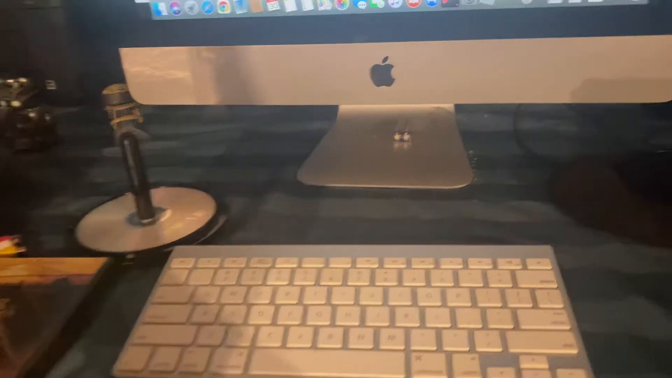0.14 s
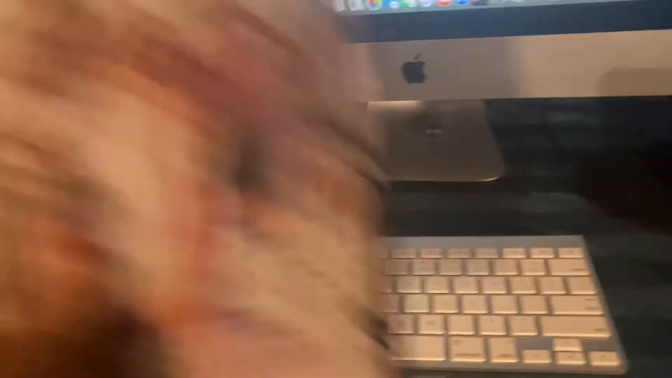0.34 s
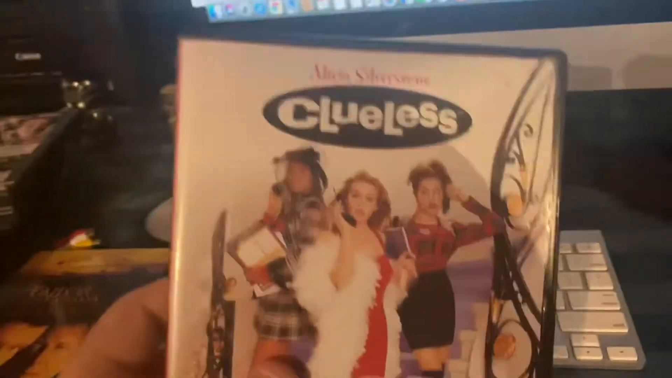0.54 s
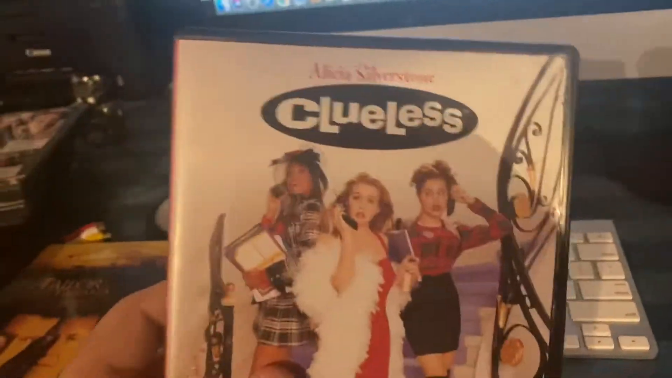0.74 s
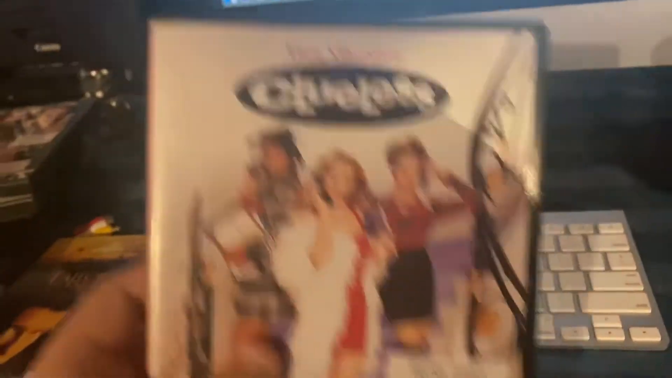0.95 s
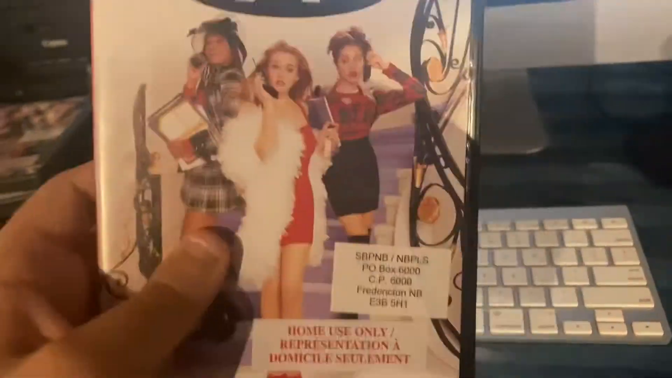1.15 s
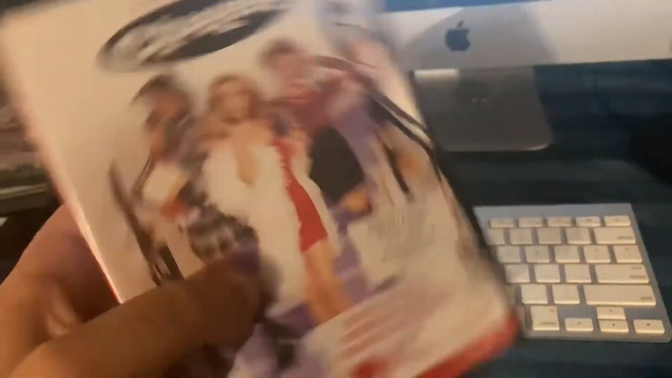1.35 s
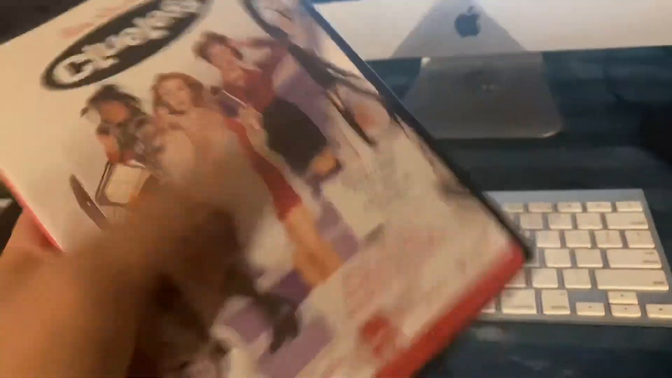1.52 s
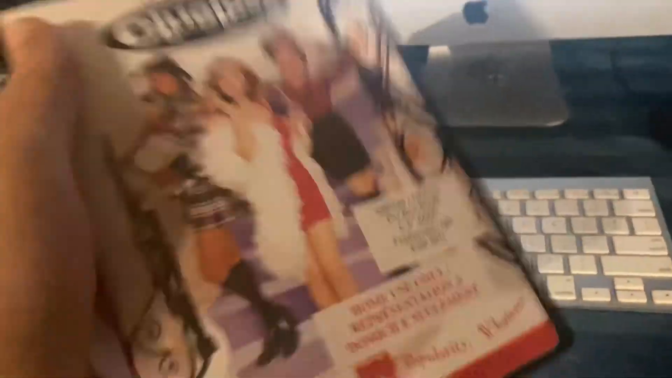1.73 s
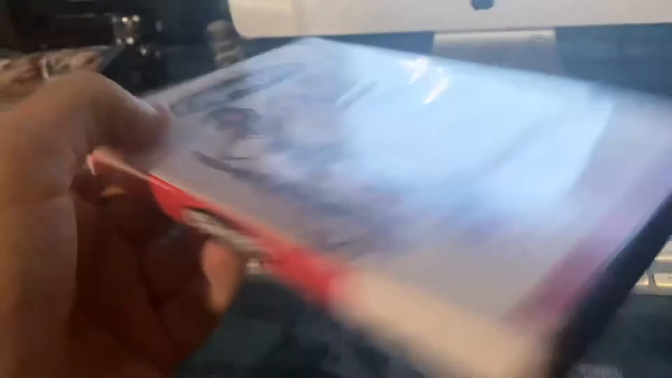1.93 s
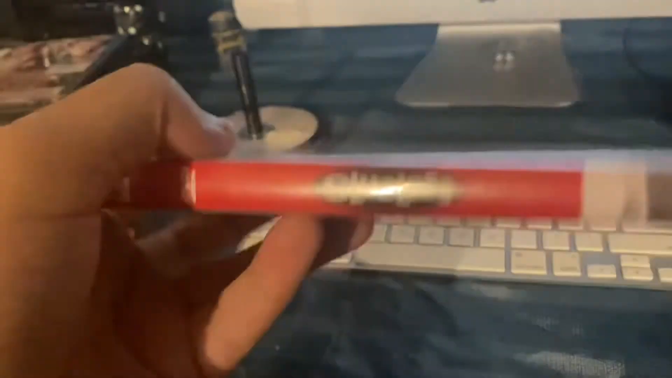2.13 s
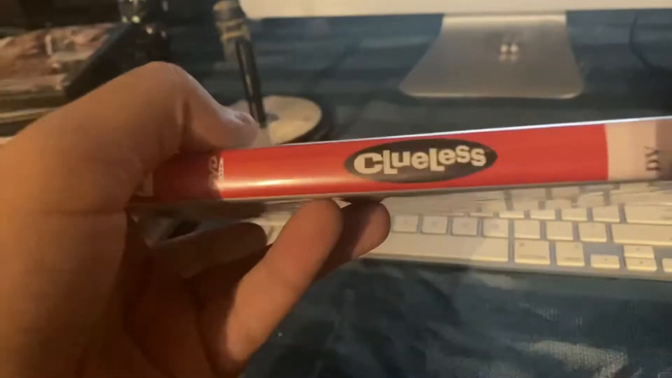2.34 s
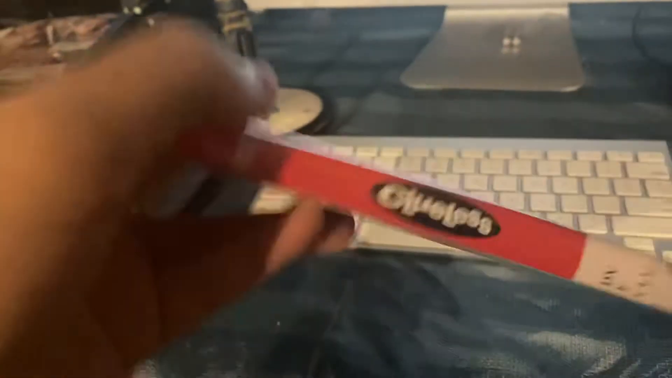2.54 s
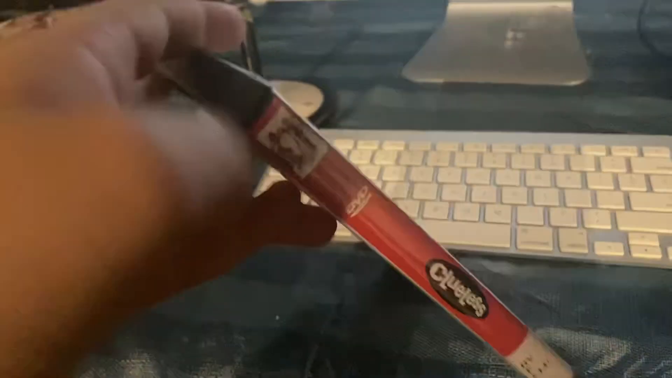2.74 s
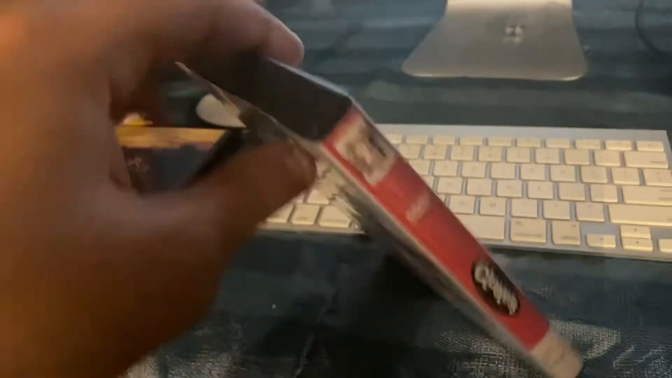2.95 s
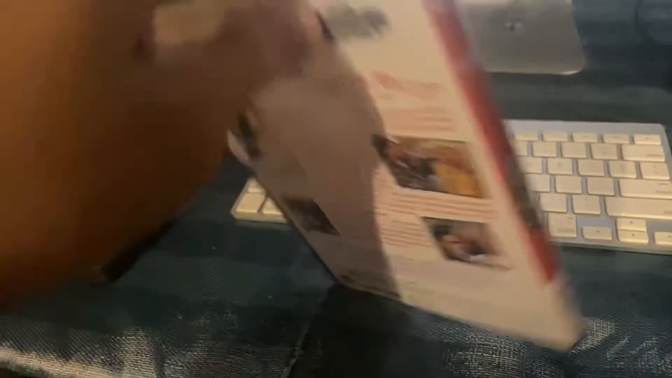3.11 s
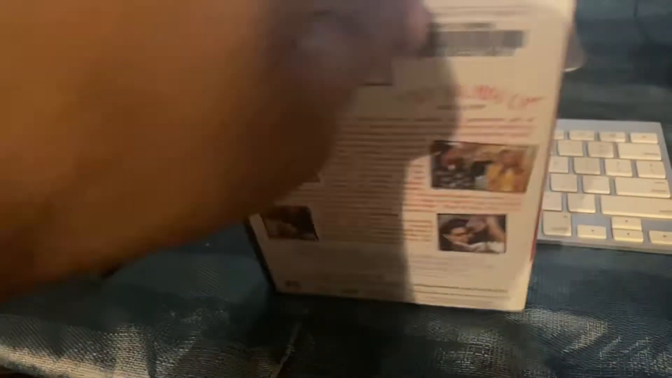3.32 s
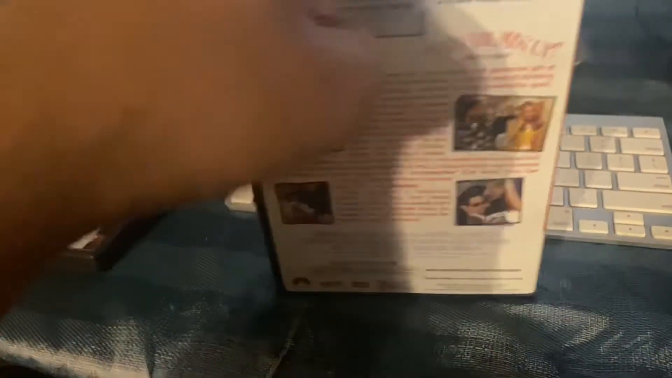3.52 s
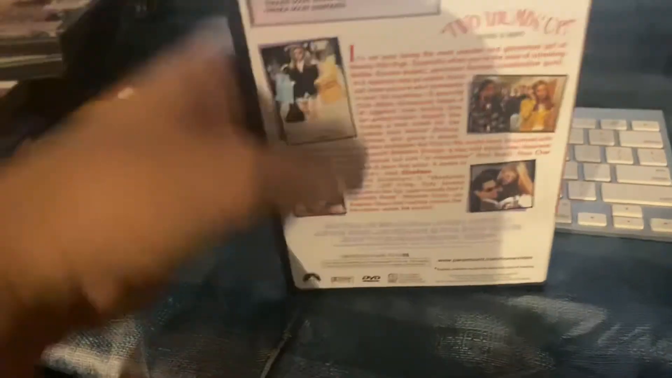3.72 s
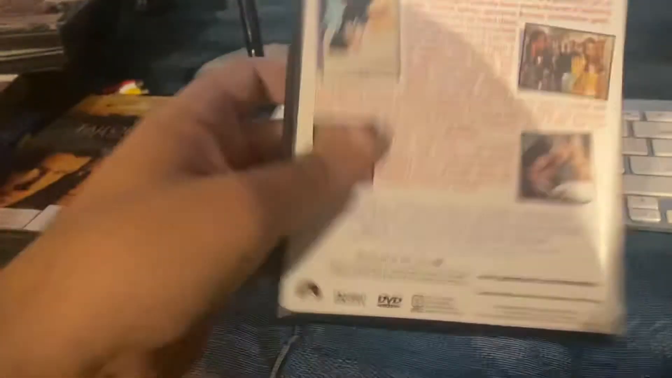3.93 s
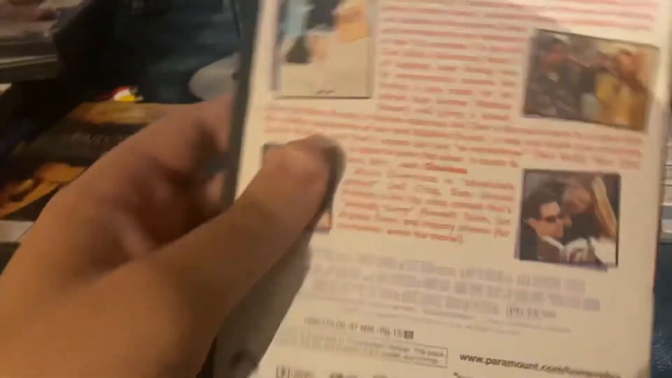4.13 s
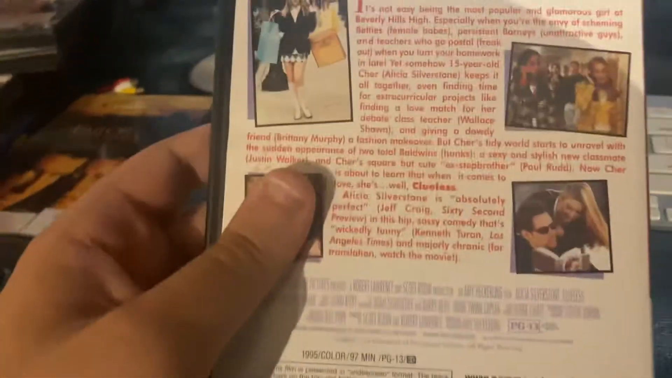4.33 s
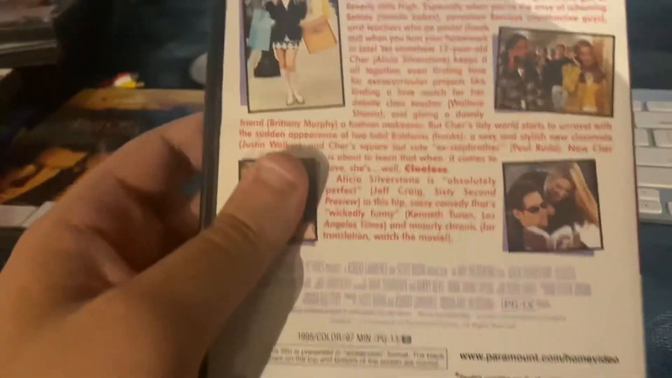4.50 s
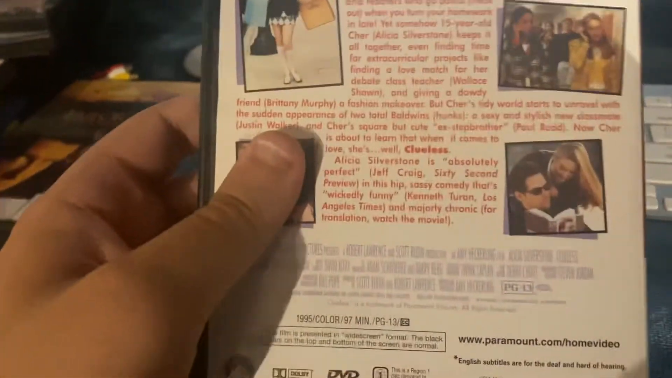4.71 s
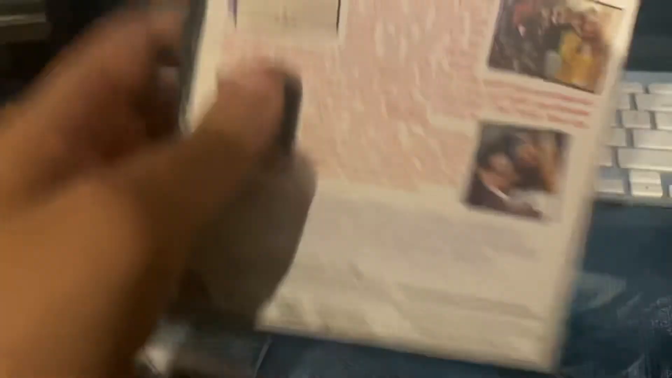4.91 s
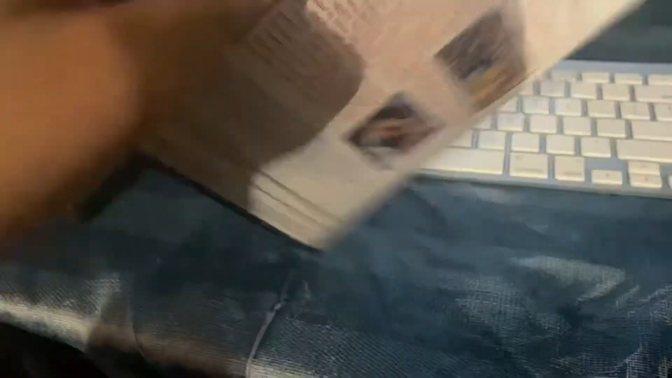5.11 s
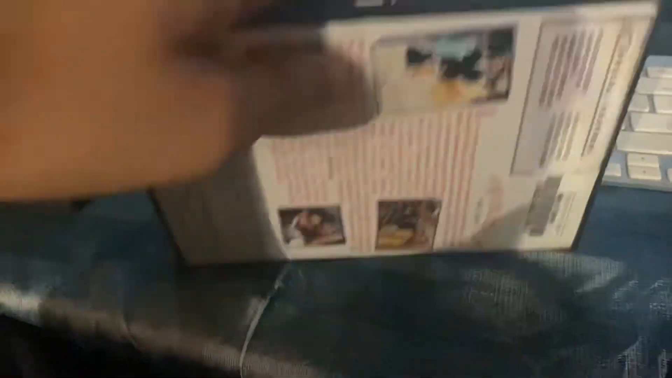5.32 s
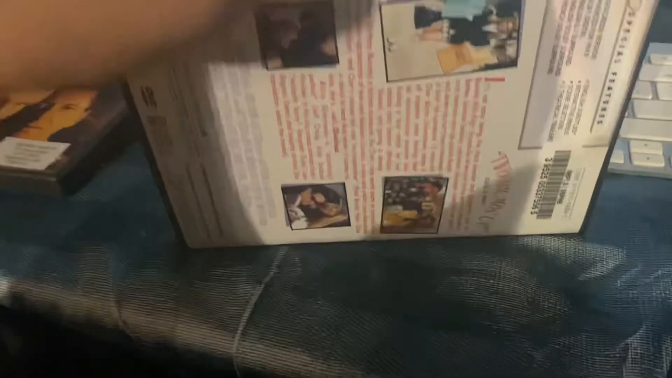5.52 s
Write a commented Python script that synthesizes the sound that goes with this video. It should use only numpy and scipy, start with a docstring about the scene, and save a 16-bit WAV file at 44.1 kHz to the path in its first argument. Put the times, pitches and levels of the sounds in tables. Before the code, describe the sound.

In a small quiet room with a low computer hum, a brief bright swish opens, then about a second of near stillness. Fingers tick and creak on a hollow plastic disc case, pause, then a hard clack on the desk starts a busier run of taps, scuffs and bumps. After a quiet gap with soft grip rumbles, the case drops sharply onto its edge and rattles. Close handheld phone microphone, stereo.

```python
"""A computer hums in a small room, and a quick bright swish passes as a hand reaches for a plastic disc case.
The hand turns the case over above a desk, close to a phone: fingers tick, scuff and squeak on shell and sleeve.
The case bumps the desk a few times and at last drops onto its edge; the holding hand adds soft rumbles.
Contacts are noise bursts plus ringing modes; scuffs are tiny clicks and hiss; the swish and the air are
shaped noise; the hum is a set of sines."""
import sys
import numpy as np
from scipy import signal
from scipy.fft import rfft, irfft
from scipy.io import wavfile
from scipy.ndimage import uniform_filter1d

SR = 44100
rng = np.random.default_rng(int(sys.argv[2]) if len(sys.argv) > 2 else 0)


def transcribe(u):
    """Save the signal u as a 16-bit wav file named by the first command-line argument.

    u: samples, shape (n,) or (channels, n), limited to [-1, 1]; the rate is SR.
    q: integer samples, one column per channel.
    """
    v = np.clip(np.atleast_2d(u).T, -1, 1)
    q = np.round(v * 32767).astype(np.int16)
    wavfile.write(sys.argv[1], SR, q)


N = 249606
T = np.arange(N) / SR  # time of every sample, s

# Steady fan and mains tones: pitch_hz, level_db (rms, around which it wavers)
HUM_TONES = [(53.8, -53.5), (119.5, -56), (163, -62.5), (195, -65), (237, -74.5), (376.8, -70.5),
             (753.7, -85), (1130, -86.5), (1507, -87.5), (2266, -95), (2643, -93.5), (3020, -100)]
# Colour of the room's air noise: pitch_hz, relative_db (per Hz)
AIR_COLOUR = [(15, -34), (25, -16.5), (127, -5), (285, -17.5), (373, -12), (427, -20), (818, -33.5),
              (1520, -36.5), (1650, -39.5), (2690, -47), (3250, -53), (6920, -57), (9070, -63.5),
              (11600, -60), (16000, -77.5)]
# Colour of the swish: pitch_hz, relative_db (per Hz)
SWISH_COLOUR = [(500, -17), (1500, -14), (3000, -8), (4500, -4.5), (6700, 5), (7700, -0.5), (10500, -12.5),
                (12000, -22), (15000, -18)]
# A finger taps or creaks the shell (voice levels before the taps' trim): start_s, shell_db, rim_db, sleeve_db,
# hollow_pitch_hz, hollow_db (against the shell), rim_pitch_hz, rim_tone_db (against the other rim modes)
TAPS = [(.192, -47.5, -53.5, -88, 485, 9, 2030, 2), (0.193, -49.5, -70, -88, 1616, -3, 1550, 8),
        (1.285, -45, -53.5, -71, 830, 2, 4390, 7), (1.301, -45.5, -54.5, -52.5, 1100, 2, 1500, 13),
        (1.359, -57, -74, -73, 980, 1, 1720, -3), (1.404, -53.5, -61, -94, 900, -11, 1674, 5),
        (1.443, -53.5, -70, -82, 850, 16, 3250, 0), (1.453, -55, -56.5, -76, 955, -12, 2310, 5),
        (1.467, -49, -56.5, -58, 900, -5, 1540, -1), (1.536, -59, -54.5, -83, 770, -10, 2460, -12),
        (1.597, -50.5, -52.5, -61, 740, 1, 1900, 1), (1.619, -54.5, -60, -64, 900, -19, 1450, 8),
        (1.699, -45, -49, -71, 720, -18, 1875, 3), (1.757, -47.5, -50.5, -77, 965, -17, 1900, 1),
        (1.771, -42.5, -55, -79, 855, 1, 1600, 2), (1.824, -54, -81, -86, 1050, -1, 1600, 0),
        (1.884, -51.5, -54.5, -66, 1220, -10, 3400, 1), (1.988, -57, -59, -68, 910, -15, 1720, 11),
        (2.034, -52.5, -54, -53, 814, 1, 2280, -7), (2.065, -62.5, -57, -70, 1100, -15, 1870, 8),
        (2.243, -61, -90, -92, 770, 7, 1600, 0), (2.819, -43.5, -43, -70, 1190, -15, 1700, 6),
        (2.834, -42.5, -46, -77, 1150, -10, 1690, 13), (2.846, -48.5, -49, -76, 1240, -18, 1650, 8),
        (2.88, -49, -62, -79, 940, 9, 1680, 0), (2.956, -49, -50.5, -64, 1020, -8, 1670, 9),
        (2.971, -49, -61, -63, 1280, -10, 3840, 7), (3.037, -41.5, -45.5, -54, 1370, -2, 1580, 9),
        (3.059, -38.5, -44, -51, 1060, 1, 1470, 1), (3.079, -41, -39, -57, 1230, -3, 1750, 10),
        (3.092, -40.5, -52, -58, 1260, -12, 3750, 0), (3.116, -51, -51, -63, 1110, -5, 1620, -5),
        (3.182, -43, -42.5, -58, 1170, -2, 1586, 7), (3.32, -46, -64, -59, 1195, 7, 1400, 8),
        (3.343, -41, -64, -73, 1190, -3, 1470, 4), (3.365, -46.5, -62, -73, 1330, -12, 1590, 14),
        (3.583, -43.5, -43.5, -60, 1240, -2, 3870, 2), (3.607, -44, -51, -75, 1150, 14, 1460, 4),
        (3.81, -49, -53.5, -70, 1140, 1, 3990, -3), (3.849, -49, -60, -48.5, 1120, 20, 1510, 2),
        (3.933, -49.5, -63, -88, 890, -11, 3280, 2), (4.04, -50.5, -59.5, -65.5, 814, 17, 2100, 10),
        (4.075, -54.5, -54, -86, 940, -17, 2220, 8.5), (4.095, -50, -55, -91, 904, -6, 2280, 0.5),
        (4.816, -62, -73, -63, 946, -9, 3200, -3), (4.929, -65, -83, -88, 990, -4.5, 1610, 3),
        (4.971, -67.5, -74, -82, 960, -7.5, 1585, 4), (5.397, -72, -49, -42, 950, -3, 6300, 12),
        (5.449, -48, -56.5, -78, 960, 0, 1610, 0), (5.623, -51.5, -75, -82, 1010, -7, 3840, -2),
        (5.648, -53, -58, -86, 975, -2, 3520, -2)]
# Resonances of the hollow shell: pitch_hz, width_hz, relative_db
SHELL_MODES = [(536, 56, -2.5), (706, 81, 6), (823, 117, 4.5), (1007, 160, 8), (1256, 150, -1),
               (1600, 130, -5), (1760, 88, -3.5), (2104, 86.2, -2), (2426, 140, 3.5), (2976, 170, -25),
               (3480, 300, 2), (4000, 440, -15), (6800, 340, -2.5)]
# Close modes of the hollow between the two halves: ratio (times the hollow tone), relative_db
HOLLOW_MODES = [(0.921, 2.5), (1, 7), (1.1, -1.5)]
# Bright modes of the stiff rim: pitch_hz, relative_db
RIM_MODES = [(2560, -5), (3260, -4), (3900, -2)]
# Hollow tone of the shell, which shifts with the way the case is held: time_s, pitch_hz
SHELL_TONE = [(1.3, 920), (1.75, 860), (2.1, 970), (2.75, 969), (2.82, 1190), (3.05, 1180), (3.6, 1120),
              (3.85, 1210), (5.3, 925), (5.4, 905), (5.6, 1015)]
# A finger or an edge of the case slides: peak_s, length_s, level_db (before the scuffs' trim), brightness_db
SCUFFS = [(1.295, 0.027, -59.5, 3), (1.707, 0.021, -51, -6.5), (1.768, 0.033, -60, 1.5),
          (1.904, 0.085, -74.5, 2.5), (2.08, 0.035, -60, -1.5), (2.181, 0.018, -82.5, 13),
          (2.367, 0.027, -85.5, 7), (2.531, 0.015, -82, 9), (2.71, 0.11, -59.5, -3.5),
          (2.757, 0.016, -37, -3), (2.852, 0.17, -56.5, -2.5), (3.038, 0.014, -65, 12),
          (3.078, 0.02, -41.5, -3), (3.161, 0.039, -48, -1.5), (3.298, 0.04, -47.5, 2),
          (3.34, 0.019, -58, -24), (3.462, 0.074, -59.5, -1), (3.556, 0.052, -54, -1),
          (3.589, 0.018, -48, -22), (3.812, 0.072, -60.5, 0), (3.95, 0.2, -85, 4), (5.313, 0.012, -29, 0.5),
          (5.413, 0.035, -50.5, -6), (5.568, 0.038, -55, -0.5)]
# The case is turned in the hand and crackles: start_s, end_s, level_db (middle of a random spread)
TURNS = [(1.321, 2.197, -67.5), (2.781, 3.39, -59.5), (3.397, 3.628, -66)]
# A fingertip squeaks on the sleeve: peak_s, length_s, pitch_hz, level_db
SQUEAKS = [(2.175, 0.019, 4750, -73.5), (2.531, 0.018, 4300, -77), (2.89, 0.031, 4220, -60)]
# The case lands, rocks and lands again (voice and thump levels before the knocks' trims): start_s, shell_db,
# rim_db, sleeve_db, panel_flex_db (against the shell), rim_pitch_hz, thump_pitch_hz, thump_db
KNOCKS = [(2.744, -29.5, -34.5, -45.5, 0, 2410, 650, -33), (2.7508, -35, -38, -56.5, -4, 1540, 258, -29.5),
          (2.764, -35, -36.5, -57.5, -13, 1640, 269, -44.5),
          (2.772, -40.5, -48.5, -56, -11, 1920, 480, -45), (2.788, -42, -45.5, -60.5, -7, 1850, 277, -54),
          (3.141, -41.5, -42.5, -61, -3, 1640, 250, -42), (3.153, -51, -44.5, -59, -4, 2480, 330, -53),
          (3.163, -48.5, -44, -61, -4, 1785, 238, -49.5), (3.276, -40.5, -47.5, -73, -9, 1440, 302, -34),
          (3.288, -47, -53, -64, 10, 1680, 383, -39), (3.297, -45.5, -44.5, -56, -14, 1610, 140, -43.5),
          (3.313, -44, -52, -66, 5, 1430, 150, -36), (3.456, -57.5, -74, -85, -12, 1500, 124, -44.5),
          (3.823, -42.5, -49.5, -59, -13, 1425, 200, -51), (3.858, -74, -81, -85, -10, 1500, 250, -46.5),
          (5.309, -32, -35, -52, -9, 1640, 257, -28.5), (5.3135, -23.5, -31.5, -47, -17, 2180, 163, -23.5),
          (5.329, -35, -36.5, -35, -15.5, 2610, 135, -27.5),
          (5.333, -29.5, -31.5, -41, -8, 3547, 332, -37.5), (5.356, -38, -39.5, -51, -6, 3060, 136, -32),
          (5.36, -60, -54, -53, -13.5, 2520, 334, -50), (5.383, -41, -48, -72, -12, 1900, 152, -38),
          (5.388, -44, -44.5, -68, -10, 3260, 201, -40), (5.403, -41, -47, -71, -6, 1940, 90, -39),
          (5.565, -43, -43, -56, -8, 3960, 203, -50), (5.576, -45.5, -53, -58, -5, 2330, 173, -50),
          (5.595, -51.5, -47, -74, -9, 3790, 140, -56), (5.658, -52, -57, -78, 2, 3870, 330, -68)]
# Long modes of the broad panels, woken by a knock: pitch_hz, relative_db, fade_s (by 60 dB)
PANEL_MODES = [(367.6, -2, 0.251), (481, -5, 0.096), (597, -14, 0.62), (731, -1.5, 0.043),
               (786, 11.5, 0.16), (858, -2, 0.25), (953, -5, .27), (966, 1.5, .2), (1116, -0.5, 0.18),
               (1290, -1.5, 0.14), (1550, -17.5, 0.19)]
# Modes of the covered desk top: pitch_hz, relative_db, fade_s (by 60 dB)
DESK_MODES = [(90, -5.5, 0.18), (136.8, 2, 0.16), (212, -1, 0.097), (268.3, 1, 0.08), (332.5, -0.5, 0.068),
              (401, -7, 0.037), (486, -4.5, 0.093), (619, -5.5, 0.047)]
# The grip on the phone shifts: peak_s, length_s, level_db
RUMBLES = [(3.922, 0.075, -41), (4.443, 0.071, -43), (4.779, 0.12, -56.5), (5.021, 0.039, -42),
           (5.432, 0.16, -44.5)]
# The two microphone openings: pitch_hz, balance_db (left minus right)
PORT_BALANCE = [(60, -3.5), (120, 0), (400, -2), (1600, -2.5), (2400, 1), (4400, 3), (6500, 0)]
# Phase between the openings: pitch_hz, turns (whole cycles by which left leads right)
PORT_TURNS = [(300, 0), (3000, .12), (7300, 0), (8500, -.47), (9500, -.55), (10700, -1), (11700, -1),
              (12800, -1.48), (13700, -1.52), (14800, -2)]

AIR_DB = -57
SWISH_S, SWISH_DB = 0.0708, -45
SWISH_ATTACK_S, SWISH_HOLD_S, SWISH_T60_S = 0.0037, 0.026, 0.077  # the hold counts from the start
TAP_RING_DB = 2  # the rim's ring against its dry snap
SCUFF_RIM_DB, SCUFF_SLEEVE_DB = -3, -5  # against the shell, at brightness 0
JERK_DB = 2.1  # unevenness of a stroke
SCUFF_RISE = 0.4  # share of a stroke spent speeding up
REBOUNDS, REBOUND_S, REBOUND_LOSS_DB = 2, 0.0035, 7.5  # count, mean step and loss at each step
OPEN_S, TOP_HZ = 0.072, 16000  # silence before the sound starts, top of the treble


def gain(db):
    """Turn decibels into a multiplier."""
    return 10 ** (np.asarray(db) / 20)


def unit(x):
    """Scale to an average strength (rms) of 1."""
    return x / np.sqrt(np.mean(x ** 2))


def along(points):
    """Read (pitch_hz, value) points at every bin of the spectrum, on a log pitch scale."""
    hz, value = np.transpose(points)
    bins_hz = np.arange(N // 2 + 1) * SR / N
    return np.interp(np.log(bins_hz + 1), np.log(hz), value)


def noise_of(colour):
    """Make noise of rms 1 with the given colour by reshaping the spectrum of white noise."""
    white = rng.standard_normal(N)
    return unit(irfft(rfft(white) * gain(along(colour)), N))


def band(x, lo_hz, hi_hz, order=2):
    """Keep the part of a sound between two pitches."""
    sos = signal.butter(order, [lo_hz, hi_hz], "band", fs=SR, output="sos")
    return signal.sosfilt(sos, x)


def fade(t, t60):
    """Die away smoothly, by 60 dB in t60 seconds."""
    return np.exp(-np.log(1000) * t / t60)


def walk(rate):
    """Wander smoothly at random, with about `rate` new values a second and rms 1."""
    k = int(SR / rate)
    steps = np.repeat(rng.standard_normal(N // k + 1), k)
    smooth = uniform_filter1d(uniform_filter1d(steps, k), k)
    return unit(smooth[:N])


def background(waver_db=2.5, drift=0.4, side_db=-5):
    """Fan and mains tones waver slightly, over soft air noise whose bass is alike on both sides."""
    hum = np.zeros(N)
    for hz, db in HUM_TONES:
        level = gain(db + waver_db * walk(4.3)) * np.sqrt(2)  # sqrt 2 turns rms into peak
        start_phase = rng.random()
        hum += level * np.sin(2 * np.pi * (hz * T + start_phase) + drift * walk(4.2))
    middle = noise_of(AIR_COLOUR)
    side = gain(side_db) * band(noise_of(AIR_COLOUR), 120, 16000, order=1)
    return hum + gain(AIR_DB) * (middle + side * np.array([[1], [-1]]))


def swish():
    """A quick bright swish as the hand reaches for the case: noise that rises, holds and dies away."""
    t = T - SWISH_S
    attack = np.clip(t / SWISH_ATTACK_S, 0, 1)
    release = fade(np.maximum(t - SWISH_HOLD_S, 0), SWISH_T60_S)
    return gain(SWISH_DB) * attack * release * noise_of(SWISH_COLOUR)


def add(out, s, sound):
    """Mix a sound in at time s."""
    i = int(s * SR)
    out[i:i + len(sound)] += sound[:max(N - i, 0)]


def struck(x, db, attack_s=0.011):
    """Set the level of a blow by its rms over the first milliseconds."""
    return x * gain(db) / np.sqrt(np.mean(x[:int(attack_s * SR)] ** 2))


def tone_at(s):
    """The shell's hollow tone depends on how the case is held at time s."""
    return np.interp(s, *np.transpose(SHELL_TONE))


def shell_ring(t, scatter=0.05):
    """The shell rings in fading modes; every contact wakes them in other shares."""
    hz, width, db = np.transpose(SHELL_MODES)[:, :, None]
    share, detune = rng.standard_normal((2, len(SHELL_MODES), 1))
    wave = np.sin(2 * np.pi * hz * (1 + scatter * detune) * t)
    return np.sum(share * gain(db) * np.exp(-np.pi * width * t) * wave, axis=0)


def hollow(t, tone_hz, t60, scatter=0.015):
    """The hollow of the case rings in a few close modes around its tone."""
    ratio, db = np.transpose(HOLLOW_MODES)[:, :, None]
    hz = tone_hz * ratio * (1 + scatter * rng.standard_normal(ratio.shape))
    modes = np.sum(gain(db) * np.sin(2 * np.pi * hz * t), axis=0)
    return unit(modes * fade(t, t60))


def ringing(t, hz, db, t60, scatter=0.012, share_spread_db=2):
    """A struck object rings in fading modes, in slightly other shares and with either sign each time."""
    share, detune, side = rng.standard_normal((3, len(hz)))
    t = t[:, None]
    strength = np.sign(side) * gain(db + share_spread_db * share)
    wave = np.sin(2 * np.pi * hz * (1 + scatter * detune) * t)
    return unit(np.sum(strength * wave * fade(t, t60), axis=1))


def rim_ring(t, tone_hz, tone_db, t60=0.026):
    """The rim rings in bright modes that shift a little each time, plus the tone of the touched spot."""
    hz, db = np.transpose(RIM_MODES)
    hz = hz * (1 + 0.04 * rng.standard_normal(len(hz)))
    return ringing(t, np.append(hz, tone_hz), np.append(db, tone_db), t60)


def radiate(blow, touch, tone_hz, flex_db=-8, top_db=-8, span=1.396, spot_spread=0.0553):
    """A contact speaks with three voices of rms 1: the flexing shell, its hard rim and the thin sleeve."""
    # every spot on the rim has a pitch of its own
    spot = np.exp(np.clip(spot_spread * rng.standard_normal(), -0.3, 0.3))
    around_tone = unit(band(blow, tone_hz / span, tone_hz * span))
    body = around_tone + gain(flex_db) * unit(band(blow, 222, 517))
    rim_main = unit(band(blow, 1850 * spot, 4100 * spot, order=3))
    rim = rim_main + gain(top_db) * unit(band(touch, 5310, 7080, order=3))
    sleeve = band(touch, 7500, 14000)
    return unit(body), unit(rim), unit(sleeve)


def click(tone_hz, levels_db, flex_db, rim_hz, rim_tone_db, rim_ring_db, top_db, snap_t60, give_s,
          hollow_db, hollow_t60, panel_t60=0.084, panel_db=-13, ring_db=-12, chatter=1.0):
    """One contact is a chattering snap that sets off the shell, rim, hollow and dense panel ring."""
    t = T[:SR // 5]
    grains = np.exp(chatter * unit(uniform_filter1d(rng.standard_normal(len(t)), SR // 1000)))
    snap = rng.standard_normal(len(t)) * grains * fade(t, snap_t60)
    panels = rng.standard_normal(len(t)) * fade(t, panel_t60) * gain(panel_db)
    push = 1 - np.exp(-t / give_s)  # a soft contact builds up gradually
    blow = (snap + panels + gain(ring_db) * shell_ring(t)) * push
    body, rim, sleeve = radiate(blow, snap, tone_hz, flex_db, top_db)
    body = body + gain(hollow_db) * unit(hollow(t, tone_hz, hollow_t60) * push)
    rim = rim + gain(rim_ring_db) * unit(rim_ring(t, rim_hz, rim_tone_db) * push)
    return sum(struck(voice, db) for voice, db in zip((body, rim, sleeve), levels_db))


def taps(trim_db=-4.5):
    """Soft fingers click the shell: hollow on a panel, with a short narrow ring at the rim."""
    out = np.zeros(N)
    for s, shell_db, rim_db, sleeve_db, hollow_hz, hollow_db, rim_hz, rim_tone_db in TAPS:
        levels = trim_db + np.array([shell_db, rim_db, sleeve_db])
        add(out, s, click(hollow_hz, levels, 0.24, rim_hz, rim_tone_db, rim_ring_db=TAP_RING_DB,
                          top_db=-12.5, snap_t60=0.016, give_s=0.0029,
                          hollow_db=hollow_db, hollow_t60=0.017))
    return out


def voices(db, bright_db, rim_db, sleeve_db):
    """A harder contact lifts the rim against the shell, and the sleeve twice as much."""
    return db, db + rim_db + bright_db, db + sleeve_db + 2 * bright_db


def stick_slip(slips_per_s, spread_db, hiss_db):
    """Skin sticks and slips: tiny random clicks over the hiss of the film, both coming in jerks."""
    happens = rng.random(N) < slips_per_s / SR
    sign = rng.choice([-1, 1], N)
    size = gain(spread_db * np.minimum(rng.exponential(size=N), 3))
    rough = unit(happens * sign * size) + gain(hiss_db) * rng.standard_normal(N)
    return unit(rough * gain(JERK_DB * walk(140)))


def rubbing(slips_per_s=650, spread_db=3, trim_db=-1.3, ring_db=-43, edge=1.394, hiss_db=-5):
    """Each scuff is a swell of stick-slip clicks and hiss that also rings the shell."""
    slips = stick_slip(slips_per_s, spread_db, hiss_db)
    out = np.zeros(N)
    for s, length, stroke_db, bright_db in SCUFFS:
        levels = voices(stroke_db, bright_db, SCUFF_RIM_DB, SCUFF_SLEEVE_DB)
        near = abs(T - s) < 0.2
        touch = slips[near]
        ring = signal.fftconvolve(touch, shell_ring(T[:SR // 10]))[:near.sum()]
        blow = touch + gain(ring_db) * ring
        t = T[near] - s
        side_s = np.where(t < 0, length * SCUFF_RISE, length * (1 - SCUFF_RISE))
        stroke = np.exp(-abs(t / side_s) ** edge / 2)
        parts = radiate(blow, touch, tone_at(s), flex_db=-7, top_db=-1.0, span=1.33)
        out[near] += stroke * sum(gain(db + trim_db) * voice for voice, db in zip(parts, levels))
    return out


def crackle(per_s=45, spread_db=-1.5, bright_spread_db=3):
    """Shell and sleeve creak faintly at random moments while the case turns."""
    out = np.zeros(N)
    for start, end, db in TURNS:
        s = start
        for wait, size, bright in rng.standard_normal((60, 3)):
            s += abs(wait) * np.sqrt(np.pi / 2) / per_s  # the mean wait is 1 / per_s
            if s >= end:
                break
            levels = voices(db + spread_db * size, bright_spread_db * bright, rim_db=-3.5, sleeve_db=-32.0)
            rim_hz = 2000 * 2 ** (rng.random() - 0.5)
            add(out, s, click(tone_at(s), levels, flex_db=1, rim_hz=rim_hz, rim_tone_db=3, rim_ring_db=-2,
                              top_db=-18, snap_t60=0.0059, give_s=0.0015,
                              hollow_db=-20.0, hollow_t60=0.018))
    return out


def squeaks(span=1.07):
    """A fingertip drags on the sleeve with a thin, rough whistle: a swell of very narrow noise."""
    out = np.zeros(N)
    for s, length, hz, db in SQUEAKS:
        swell = np.exp(-((T - s) / length) ** 2)
        out += gain(db) * swell * unit(band(rng.standard_normal(N), hz / span, hz * span))
    return out


def thump(centre_hz, db, focus_db=11, push_s=0.00051, boom_db=-15, boom_t60=0.26):
    """The desk top gives under the case: modes near centre_hz ring most, and the whole desk booms on."""
    t = T[:SR // 3]
    hz, mode_db, t60 = np.transpose(DESK_MODES)
    focused_db = mode_db - focus_db * abs(np.log2(hz / centre_hz))  # focus_db lower per octave away
    modes = struck(ringing(t, hz, focused_db, t60), 0, attack_s=0.02)
    boom = gain(boom_db) * unit(band(rng.standard_normal(len(t)), 54, 230)) * fade(t, boom_t60)
    push = 1 - np.exp(-t / push_s)
    return struck((modes + boom) * push, db, attack_s=0.029)


def knocks(trim_db=-1, thump_trim_db=-1, thump_lag_s=0.00099, panel_db=-14):
    """Each landing clacks and chatters at uneven steps; the panels ring on and the desk thumps."""
    out = np.zeros(N)
    for s, shell_db, rim_db, sleeve_db, flex_db, rim_hz, desk_hz, desk_db in KNOCKS:
        for k in range(REBOUNDS + 1):
            levels = np.array([shell_db, rim_db, sleeve_db]) + trim_db - k * REBOUND_LOSS_DB
            delay = k * REBOUND_S * (0.5 + rng.random())
            add(out, s + delay, click(tone_at(s), levels, flex_db, rim_hz, rim_tone_db=2, rim_ring_db=-1,
                                      top_db=-4, snap_t60=0.012, give_s=0.00067,
                                      hollow_db=-6.5, hollow_t60=0.025))
        panels = ringing(T[:SR // 3], *np.transpose(PANEL_MODES))
        add(out, s, struck(panels, shell_db + panel_db))
        add(out, s + thump_lag_s, thump(desk_hz, desk_db + thump_trim_db))
    return out


def grip():
    """The shifting grip rumbles softly through the body of the phone: swells of low noise."""
    out = np.zeros(N)
    for s, length, db in RUMBLES:
        swell = np.exp(-((T - s) / length) ** 2)
        noise = band(rng.standard_normal(N), 26, 73.0, order=3)
        out += gain(db) * swell * noise / np.sqrt(np.average(noise ** 2, weights=swell))
    return out


def room(x, wet_db=-4.5, low_t60=0.34, high_t60=0.0428, gap_s=0.00245, apart=2.32, early_t60=0.026):
    """Desk and screen answer almost at once, the walls with a tail that differs by side above the bass."""
    t = T[:SR // 2]
    shared, *own = rng.standard_normal((3, len(t)))
    noise = shared + apart * band(np.array(own), 330, 16350, order=1)
    low = band(noise, 86, 5900, order=1) * fade(t, low_t60)
    high = gain(-18.0) * band(noise, 5700, 12110, order=1) * fade(t, high_t60)
    tail = (low + high) * (1 + 6.5 * fade(t, early_t60)) * (t > gap_s)
    # unit gain across the middle of the spectrum
    tail /= np.sqrt(np.mean(abs(rfft(tail)[:, 250:1500]) ** 2))
    return x + gain(wet_db) * signal.fftconvolve(x[None], tail, axes=1)[:, :N]


def scene():
    """The handled case sounds in the room, with the hum and the grip on the phone added directly."""
    case = swish() + taps() + rubbing() + crackle() + squeaks() + knocks()
    return background() + room(case) + grip()


def record(dry):
    """The phone's two openings differ in level and phase; it starts after a moment and cuts the top."""
    ports = gain(np.array([[0.5], [-0.5]]) * along(PORT_BALANCE)) + 0j
    ports[1] *= np.exp(-2j * np.pi * along(PORT_TURNS))
    heard = irfft(rfft(dry) * ports, N) * (T > OPEN_S)
    return signal.sosfilt(signal.ellip(8, 0.2, 70, TOP_HZ, fs=SR, output="sos"), heard)


dry = scene()
out = record(dry)
transcribe(out)
```